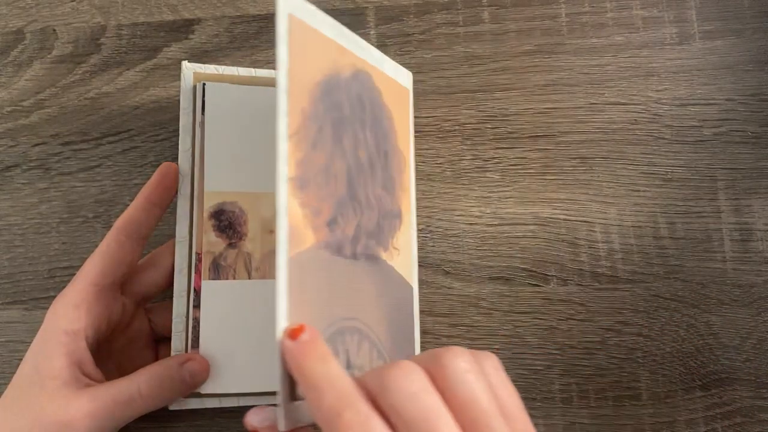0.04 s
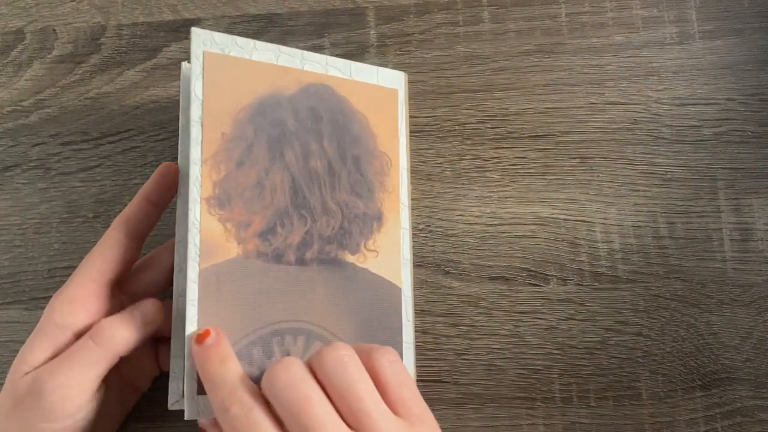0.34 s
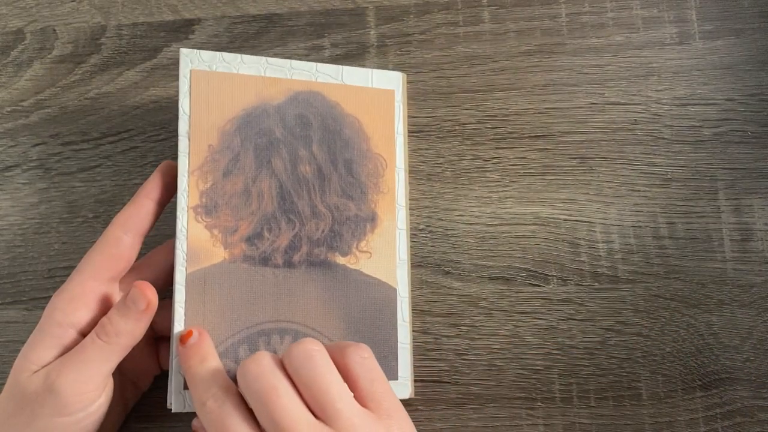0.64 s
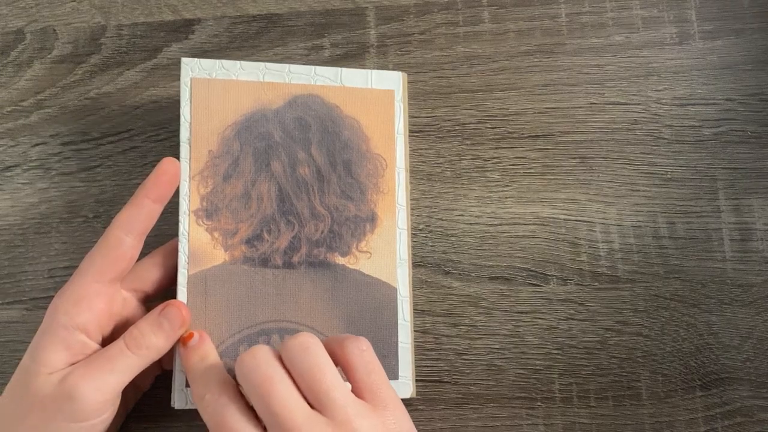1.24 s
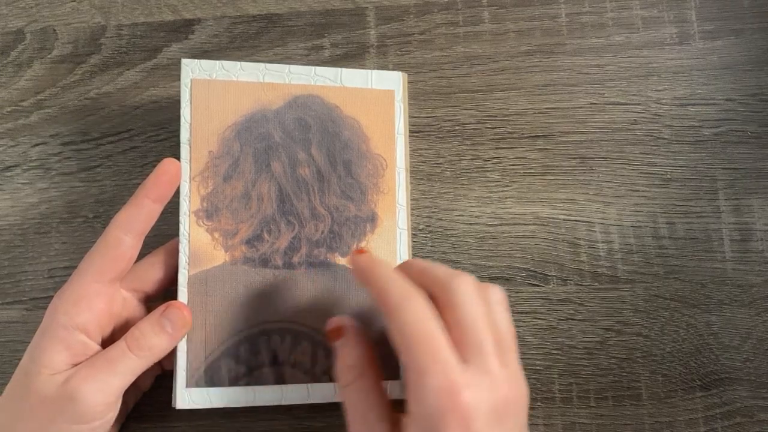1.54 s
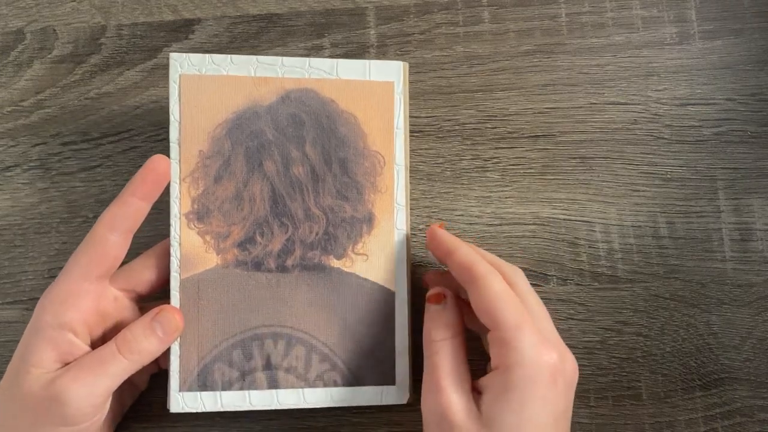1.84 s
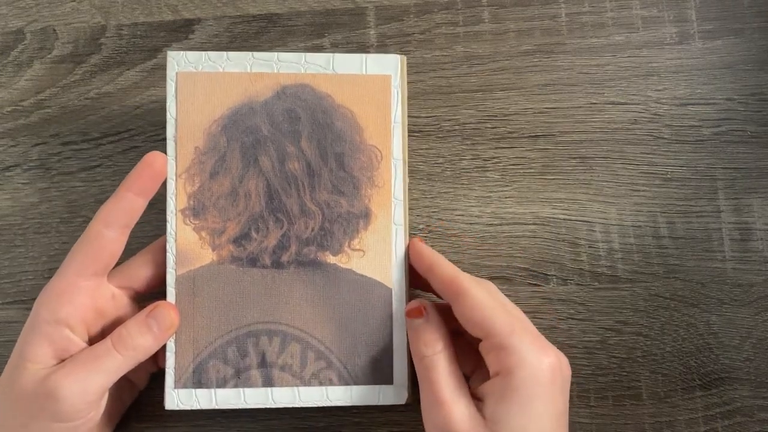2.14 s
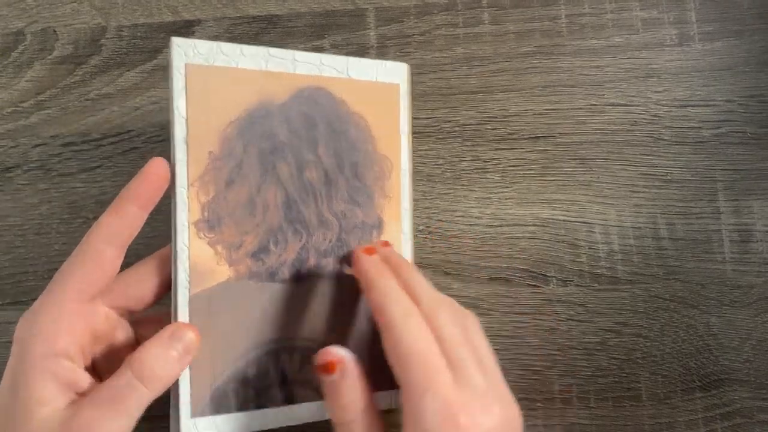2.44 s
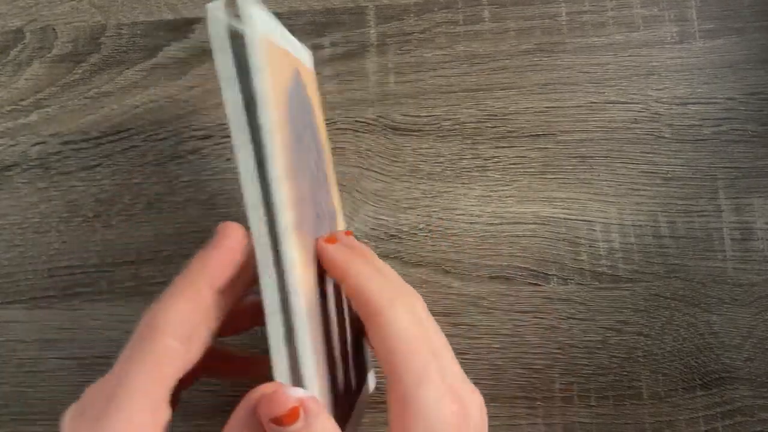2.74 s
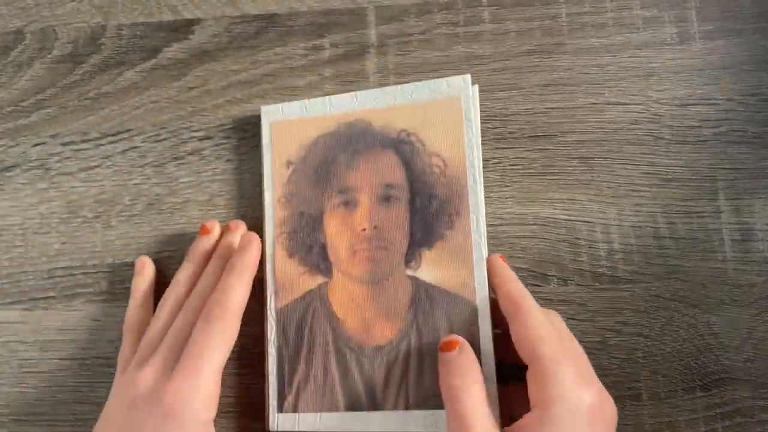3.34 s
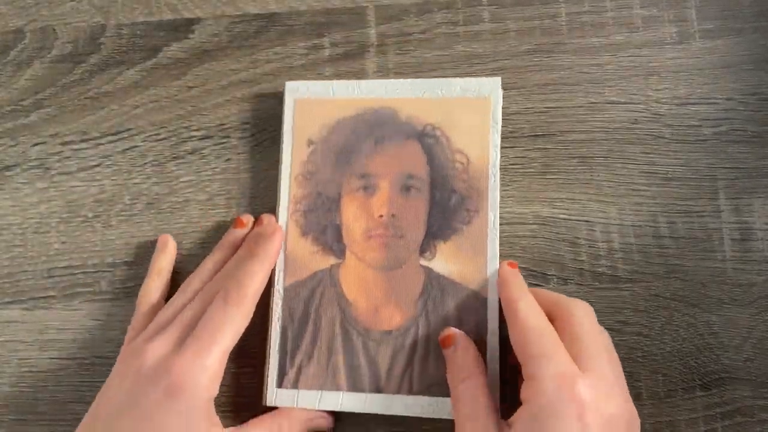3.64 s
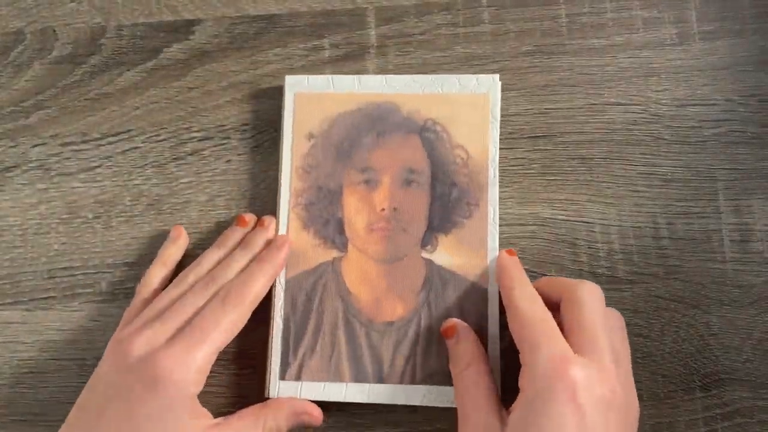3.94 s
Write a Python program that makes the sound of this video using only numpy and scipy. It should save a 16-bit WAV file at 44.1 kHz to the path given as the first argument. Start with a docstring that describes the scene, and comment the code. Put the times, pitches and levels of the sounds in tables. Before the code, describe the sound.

A small book shuts with a light papery snap. After a quiet pause it is turned over on a wooden table, landing with three dull thumps amid rustling and sliding. Close microphone, quiet room, low hum underneath.

```python
"""In a quiet room, a small paper book is closed, turned over and laid on a wooden table.
The cover snaps shut, fingers and pages slide with a rustle, and the book drags on the wood.
Its spine and boards land with thumps that make the table top ring.
A mains hum and a low rumble lie underneath. Two microphone openings (ports), close together, listen."""
import sys
import numpy as np
from scipy import signal
from scipy.fft import rfft, irfft
from scipy.io import wavfile
from scipy.ndimage import uniform_filter1d, map_coordinates

SR = 44100
rng = np.random.default_rng(int(sys.argv[2]) if len(sys.argv) > 2 else 0)


def inscribe(sig):
    """Save sig as 16-bit PCM at rate SR to the path in sys.argv[1].

    A 1-D sig is mono; a 2-D sig holds one channel per row.
    Samples are clipped to [-1, 1] before scaling.
    """
    pcm = np.round(np.clip(np.atleast_2d(sig).T, -1, 1) * 32767)
    wavfile.write(sys.argv[1], SR, pcm.astype(np.int16))


N = 176400
T = np.arange(N) / SR
HZ = np.fft.rfftfreq(N, 1 / SR)

# The book's edges landing; the spot they hit decides which pitches ring most.
# start_s, ring_db, boom_db, swell_s, then one boost_db for each of THUMP_BANDS_HZ
THUMPS = [(.103, -57.5, -61, 0.019, 4, -4, -1.5, 2.5, 6, -1, -6),
          (.541, -64.5, -68, .0041, 4, 1.5, -1, -7, -8, -5, 3),
          (2.43, -28.5, -32.5, 0.016, 2.5, 1, -1.5, 8.5, -4, -2.5, 0.5),
          (2.468, -44, -40.5, 0.0061, 5.5, 1.5, -0.5, -6.5, -22, -18, -16.5),
          (2.946, -26.5, -32.5, 0.006, -5, -2, 1, -2, 0, 0.5, -6),
          (3.012, -44.5, -57, .005, 6, -8, 9, -26, -23, -22, 2),
          (3.148, -30.5, -34.5, 0.012, -1.5, 5, -1, -0.5, -7, -1.5, 0.5),
          (3.184, -43, -42.5, .005, 0, -3, 4, 2.5, -12, -15, -6),
          (3.27, -48.5, -56, 0.0034, -1, 11.5, -6.5, -18, -17, -4, -14),
          (3.713, -51.5, -53.5, 0.016, 1, 4, 0.5, 11, 8, 12, -1)]
# Where those boosts apply: pitch_hz
THUMP_BANDS_HZ = [64, 91, 170, 370, 455, 520, 700]
# The table top's own notes: pitch_hz, level_db, fade_s (always the time to fall by 60 dB)
TABLE_NOTES = [(64.2, -4.5, 0.54), (91.6, -5.5, 0.45), (134.3, 3, .25), (157.8, -5, 0.31),
               (242.5, -7.5, 0.22), (298, -3, 0.096), (317.6, -8.5, 0.21), (364.4, -7, 0.13),
               (391, -4.5, 0.12), (411, -27.5, 1.0), (462, -8.5, 0.12), (496, -26, .5), (533, -9.5, .11),
               (710, -35.5, 0.18)]
# The dense, dull ring of table and book: pitch_hz, level_db, fade_s
BOOM_TONE = [(26, -35, 0.24), (46, -6.5, 0.32), (65, -11.5, 1), (152, -3, 0.42), (286, -6, 0.17),
             (388, -7, 0.14), (504, -2.5, 0.15), (665, -22.5, 0.098), (1100, -27, 0.056),
             (1740, -55.5, 0.091)]
# Paper edges snapping and tapping:
# start_s, level_db, length_s, treble_db_per_octave, peak_hz, peak_db, body_db, cover_db
SNAPS = [(0.1011, -46.5, 0.0037, 1.5, 1250, 9.5, -3, -3), (0.1484, -52.5, 0.0042, -2.5, 2010, 3, -21, -27),
         (0.195, -69, .0029, 6, 4500, 6, -1, -15), (2.4283, -63.5, 0.0054, -1, 1200, 9, 1, -12),
         (2.9466, -48.5, 0.0057, 2, 4570, 4.5, 13.5, -6), (3.145, -51, 0.0052, -10, 990, 3.5, 4.5, -5.5),
         (3.707, -43, 0.0067, -6.5, 2580, 10.5, -1.5, -3.5)]
# The tone of a snap: pitch_hz, level_db
SNAP_TONE = [(150, -13), (300, 9.5), (380, -0.5), (490, 1.5), (620, -7), (900, 3.5), (1250, 2), (1850, -1),
             (2200, -3), (2700, -7), (3200, 0.5), (3750, -8.5), (4350, 0), (5500, -1), (7200, -7),
             (11000, -5.5), (16000, -15)]
# The stiff cover's own notes: pitch_hz, level_db, fade_s
COVER_NOTES = [(289, -11.5, 0.057), (507, -8.5, 0.054), (691, -13.5, 0.1), (960, -14, 0.07),
               (1265, -20.5, 0.034), (1610, -15, 0.028), (2070, -7, 0.045)]
# Skin and paper sliding:
# start_s, rise_s, hold_s, release_s, level_db, body_db, treble_db, peak_hz, peak_db
SLIDES = [(0.949, 0.018, 0.01, 0.018, -72.5, 11.5, -4.5, 930, 8.5),
          (1.278, .02, .015, 0.027, -79.5, -3, 8.5, 5770, 8),
          (1.84, .04, .13, 0.1, -86, -1, -2.5, 3700, 12),
          (1.996, 0.061, 0.013, 0.11, -81.5, -15, -10.5, 11500, 11.5),
          (2.232, 0.13, .01, 0.052, -73, 8.5, 2, 3920, 9.5),
          (2.499, 0.0079, 0.16, 0.036, -68, 0, -2, 7450, 4.5),
          (2.731, 0.12, 0.0044, 0.077, -56, 1, -2, 2235, 3),
          (2.898, 0.018, 0.0033, 0.011, -57.5, 6.5, 0.5, 6200, 6),
          (2.912, 0.032, 0.083, 0.12, -63, 6, -6.5, 6260, 3.5),
          (3.04, 0.022, 0.005, 0.021, -58, -13, -7.5, 3240, 8.5),
          (3.051, 0.13, 0.22, 0.22, -68, 5.5, -5, 5700, 4),
          (3.291, 0.06, 0.017, 0.086, -61, 9.5, 1, 7260, 3.5),
          (3.521, 0.044, 0.023, 0.025, -62.5, 5.5, -6.5, 5550, -0.5),
          (3.557, 0.096, 0.022, 0.091, -55.5, 2.5, -3.5, 1530, 5),
          (3.679, 0.016, 0.018, 0.18, -67, 6.5, -12, 1520, 4),
          (3.751, 0.065, 0.091, 0.17, -78.5, -5, -10, 3470, 4.5)]
# The tone of sliding paper: pitch_hz, level_db
PAPER_TONE = [(100, -15), (400, 0.5), (560, -3), (740, -15), (1000, -5.5), (1400, -8), (2000, -5),
              (3200, -3.5), (5500, -2), (8000, -4.5), (11500, 0.5), (15500, -7.5)]
# Rubbing on the wood: start_s, rise_s, hold_s, release_s, level_db, pitch_hz, width_hz
DRAGS = [(2.283, 0.042, 0.028, 0.04, -65, 364, 140), (2.78, 0.025, 0.2, 0.067, -55, 93, 23),
         (3.5, 0.14, 0.188, .049, -75, 470, 210), (3.2, 0.095, 0.25, 0.077, -70.5, 497, 30),
         (3.19, 0.076, 0.17, 0.16, -70, 364, 10), (3.117, 0.21, 0.036, 0.32, -73.5, 1300, 450),
         (3.2, 0.067, .12, 0.12, -53.5, 46, 15), (3.747, 0.085, .073, 0.34, -76.5, 1454, 140)]
# How far the wave at the left port runs ahead of the right: pitch_hz, lead_radians
LEFT_LEAD = [(0, 0), (200, -.1), (600, -.5), (1200, -.5), (1800, 0), (2400, .6), (4100, 1.1), (5000, .3),
             (6100, 1.6), (7250, 3.14), (10300, 6.28), (13450, 9.42), (15800, 12)]
# How much louder the left port is than the right: pitch_hz, level_db
LEFT_BALANCE = [(200, 0.5), (1300, -2), (4400, -1.1), (8000, 0)]
# How long the room echoes: pitch_hz, fade_s
ROOM_FADE = [(100, 0.33), (450, 0.41), (1000, 0.42), (4000, 0.16), (14000, 0.12)]
# The room's rumble and hiss: pitch_hz, level_db
BACKGROUND_TONE = [(20, -20.5), (31, -18.5), (42, 8.5), (70, 2.5), (130, -9.5), (200, -21), (400, -25),
                   (620, -19), (850, -33.5), (1500, -34.5), (3000, -38.5), (6000, -43), (10000, -48.5),
                   (16000, -45.5)]


def table_thumps():
    """Each landing swells into the table's notes and a dull boom; the bass arrives last."""
    out, t = np.zeros(N), T[:SR]
    for start, ring_db, boom_db, swell, *band_db in THUMPS:
        spot = list(zip(THUMP_BANDS_HZ, band_db))
        ring = sum((-1) ** k * note(t, hz, db + look_up(spot, hz), fade)
                   for k, (hz, db, fade) in enumerate(TABLE_NOTES))
        ring *= 1 - np.exp(-(t / swell) ** 2)
        boom = colour(rng.choice([-1., 1.], 2 * SR), look_up(BOOM_TONE, HZ) + look_up(spot, HZ))
        boom = fade_by_pitch(unit(boom[SR:]), BOOM_TONE, column=2) * np.minimum(t / swell, 1)
        add(out, start, amp(ring_db) * ring + amp(boom_db) * boom)
    # The whole top takes longer to get moving than the spot that is hit.
    lag_s = 0.0058 / (1 + (HZ / 182.5) ** 2) ** 2
    return irfft(rfft(out) * np.exp(-2j * np.pi * np.cumsum(lag_s) * HZ[1]), N)


def paper_snaps():
    """Paper edges slap together, the cover rings briefly, and the pages rustle after."""
    out, t = np.zeros(N), T[:SR // 2]
    rise = np.minimum(t / 0.001, 1)
    tail = amp(-14 - 60 * t / 0.14)
    cover = sum(note(t, hz, db, fade) for hz, db, fade in COVER_NOTES)
    for start, db, length, tilt, peak_hz, peak_db, body_db, cover_db in SNAPS:
        shape = np.exp(-(t / length) ** 4) + tail
        burst = even_out(shape * rng.choice([-1., 1.], len(t)), bins=120) * rise
        treble = tilt * np.log2(1 + HZ / 1000)
        body = body_db / (1 + (HZ / 1000) ** 4)
        tone = look_up(SNAP_TONE, HZ) + treble + body + peak(peak_hz, peak_db)
        add(out, start, amp(db) * colour(burst[:SR // 3], tone))
        add(out, start, amp(db + cover_db) * cover * rise)
    return out


def paper_slides():
    """Paper fibres catch and slip, making a stream of tiny clicks under each stroke."""
    out = np.zeros(N)
    clicks_per_s, click_share = 2500, 0.47
    clicks = (rng.random(N) < clicks_per_s / SR) * rng.choice([-1, 1], N)
    clicks = clicks * amp(-0.5 * np.minimum(rng.exponential(1, N), 4))
    rub = np.sqrt(click_share) * unit(clicks) + np.sqrt(1 - click_share) * rng.standard_normal(N)
    rub *= amp(1.27 * wander(rate_hz=75))  # a slight judder
    for start, rise, hold, release, db, body_db, treble_db, peak_hz, peak_db in SLIDES:
        slope = look_up([(1400, body_db), (2800, 0.032), (5000, 0), (10000, treble_db)], HZ)
        tone = look_up(PAPER_TONE, HZ) + slope + peak(peak_hz, peak_db)
        slide = np.roll(rub, rng.integers(N)) * stroke(start, rise, hold, release)
        out += amp(db) * colour(slide, tone)
    return patchy(out, depth_db=2, width_hz=334.6, length_s=.035)


def wood_drags():
    """Fingertips and book rub on the wood, each drag sounding around one pitch."""
    out = np.zeros(N)
    for start, rise, hold, release, db, hz, width in DRAGS:
        rub = irfft(rfft(rng.standard_normal(N)) / (1 + (2 * (HZ - hz) / width) ** 2), N)
        out += amp(db) * unit(rub) * stroke(start, rise, hold, release)
    return out


def microphone_ports(x):
    """Sound reaches the two ports out of step, then again after bouncing off table and hands."""
    turn = np.exp(.5j * np.interp(HZ, *np.transpose(LEFT_LEAD)))
    direct = irfft(rfft(x) * np.array([turn, turn.conj()]), N)
    fade = np.exp(-T[:SR // 20] / 0.0033)
    bounces = np.array([even_out(rng.standard_normal(len(fade)) * fade, bins=24) for _ in range(2)])
    bounces /= np.linalg.norm(bounces, axis=1, keepdims=True)
    bounces = np.pad(bounces, ((0, 0), (SR // 250, 0)))  # 4 ms late
    midrange = HZ ** 2 / (HZ ** 2 + 670 ** 2) / (1 + (HZ / 5340) ** 2)
    return direct + amp(-8.5) * irfft(rfft(x) * rfft(bounces, N) * midrange, N)


def page_spread(x):
    """A sliding page sounds from a wide area, so each port hears it a little differently."""
    blur = np.array([even_out(rng.standard_normal(SR // 100), bins=6) for _ in range(2)])
    blur /= np.linalg.norm(blur, axis=1, keepdims=True)
    return amp(-11.5) * signal.fftconvolve(x[None], blur, axes=1)[:, :N]


def room_echo(x):
    """The room adds a short, smooth echo, alike at both ports in the bass."""
    rise = np.minimum(T[:SR] / 0.016, 1)
    left, right = [rfft(fade_by_pitch(rng.standard_normal(SR), ROOM_FADE) * rise, N) for _ in range(2)]
    tails = irfft(share_bass(left, right, below_hz=343), N)[:, :SR]
    return np.array([signal.fftconvolve(x, tail / np.linalg.norm(tail))[:N] for tail in tails])


def room_background():
    """Rumble, mains hum and faint hiss; the rumble and hum drop near the end."""
    left, right = rfft([patchy(noise, depth_db=2.5, width_hz=129.8, length_s=.07)
                        for noise in rng.standard_normal((2, N))])
    spectrum = share_bass(left, right, below_hz=300) * amp(look_up(BACKGROUND_TONE, HZ))
    air = amp(-62.5) * unit(irfft(spectrum, N))
    rumble = irfft(rfft(air) / (1 + (HZ / 200) ** 4), N)
    hiss = air - rumble
    hum_hz, drop_at_s, drop_db = 100.2, 3.52, -10
    hum = amp(-57.5 + 0.82 * wander(rate_hz=1.3)) * np.sqrt(2) * np.sin(2 * np.pi * hum_hz * T)
    return hiss + (rumble + hum) * amp(drop_db * np.clip((T - drop_at_s) / 0.01, 0, 1))


def amp(db):
    """Turns decibels into a number to multiply by."""
    return 10 ** (np.asarray(db) / 20)


def unit(x):
    """Scales a signal to an average power of 1."""
    return x / np.sqrt(np.mean(x ** 2) + 1e-20)


def look_up(table, hz, column=1):
    """Reads a table at any pitch, blending between its rows."""
    columns = np.transpose(table)
    return np.interp(np.log(hz + 1), np.log(columns[0] + 1), columns[column])


def add(mix, start_s, sound):
    """Adds a sound to the mix at the given time."""
    part = mix[max(round(start_s * SR), 0):][:len(sound)]
    part += sound[:len(part)]


def note(t, hz, db, fade_s):
    """One pure tone dying away."""
    return amp(db - 60 * t / fade_s) * np.sin(2 * np.pi * hz * t)


def stroke(start, rise, hold, release):
    """A loudness shape that rises smoothly, holds and falls."""
    up = np.clip((T - start) / rise, 0, 1)
    down = np.clip((T - start - rise - hold) / release, 0, 1)
    return np.sin(up * np.pi / 2) ** 2 * np.cos(down * np.pi / 2) ** 2


def peak(hz, db, half_width_octaves=0.29):
    """A broad hump around one pitch, in decibels."""
    return db / (1 + (np.log2((HZ + 1) / hz) / half_width_octaves) ** 2)


def colour(x, tone_db):
    """Gives x a tone, using a filter that never rings before the sound starts."""
    log_gain = np.log(unit(amp(tone_db[::20])) + 1e-6)
    mirrored = np.r_[log_gain, log_gain[-2:0:-1]]
    taps = np.fft.ifft(np.exp(np.conj(signal.hilbert(mirrored)))).real[:4096]
    return signal.fftconvolve(x, taps)[:len(x)]


def fade_by_pitch(x, table, column=1):
    """Lets each pitch die away at its own speed."""
    hz, t, bands = signal.stft(x, SR, nperseg=512)
    fade_s = look_up(table, hz, column)[:, None]
    return signal.istft(bands * amp(-60 * t / fade_s), SR, nperseg=512)[1][:len(x)]


def even_out(x, bins):
    """Smooths away the chance peaks and dips in a short burst's tone."""
    spectrum = rfft(x)
    power = abs(spectrum) ** 2
    return irfft(spectrum / np.sqrt(uniform_filter1d(power, bins) / np.mean(power) + 1e-9), len(x))


def wander(rate_hz):
    """A smooth random wobble."""
    return unit(irfft(rfft(rng.standard_normal(N)) / (1 + (HZ / rate_hz) ** 4), N))


def patchy(x, depth_db, width_hz, length_s):
    """Makes random patches of pitch and time louder or softer."""
    hz, t, bands = signal.stft(x, SR, nperseg=512)
    grid = np.meshgrid(hz / width_hz, t / length_s, indexing="ij")
    patches = unit(map_coordinates(rng.standard_normal((200, 400)), grid, order=1, mode="wrap"))
    return signal.istft(bands * amp(depth_db * patches), SR, nperseg=512)[1][:N]


def share_bass(left, right, below_hz):
    """Makes two spectra alike in the bass and leaves them different higher up."""
    shared = 1 / (1 + (HZ / below_hz) ** 2)
    return np.array([left, shared * left + np.sqrt(1 - shared ** 2) * right])


def scene():
    """Mixes the book and table with the room's echo and background."""
    rustle, table = paper_slides(), table_thumps()
    paper = paper_snaps() + rustle + wood_drags()
    near = microphone_ports(paper + table) + page_spread(rustle)
    balance = amp(np.outer([.5, -.5], look_up(LEFT_BALANCE, HZ)))
    near = irfft(rfft(near) * balance, N)
    return near + room_echo(amp(-17.5) * paper + amp(-24.5) * table) + room_background()


def record(dry):
    """Cuts the highest treble, above 15800 Hz."""
    low_pass = signal.firwin(511, 15800, window=("kaiser", 9), fs=SR)
    return signal.oaconvolve(dry, low_pass[None], "same")


dry = scene()
out = record(dry)
inscribe(out)
```